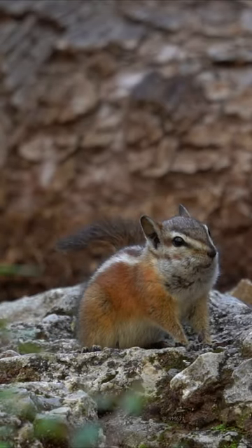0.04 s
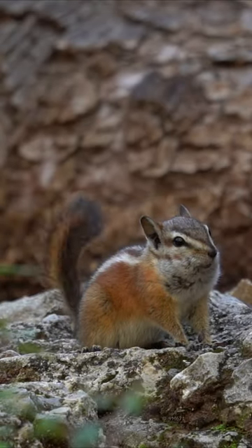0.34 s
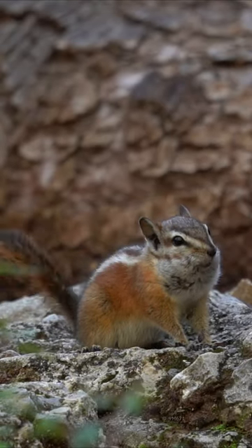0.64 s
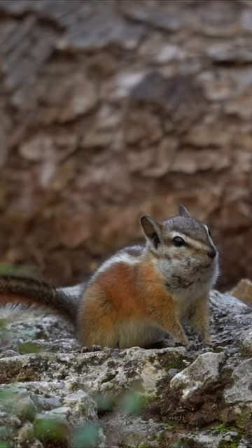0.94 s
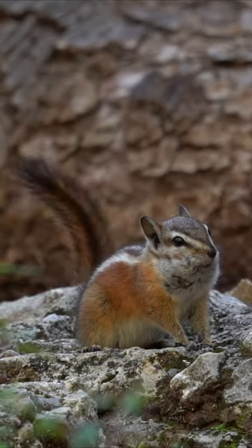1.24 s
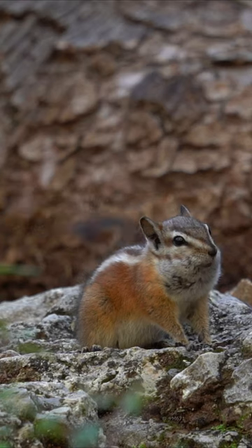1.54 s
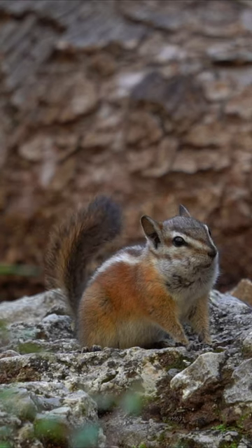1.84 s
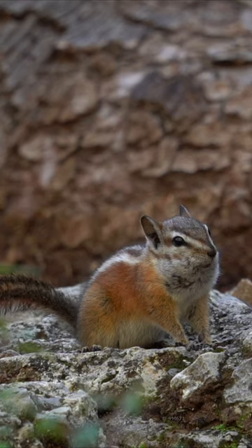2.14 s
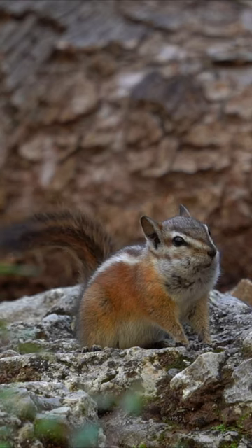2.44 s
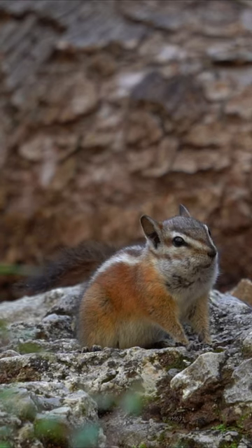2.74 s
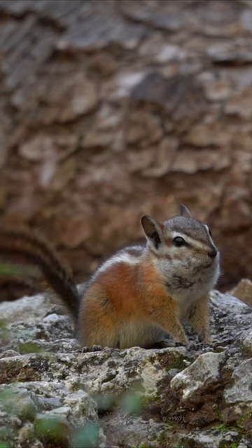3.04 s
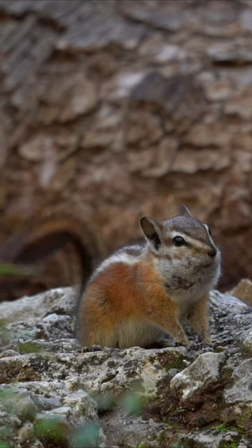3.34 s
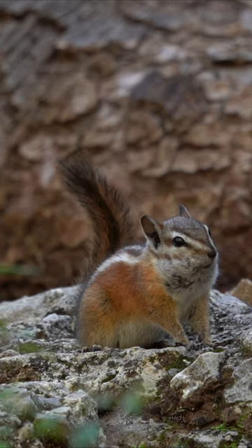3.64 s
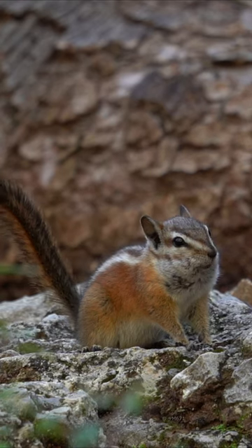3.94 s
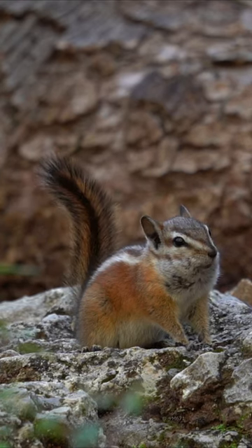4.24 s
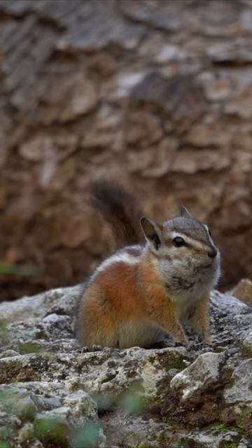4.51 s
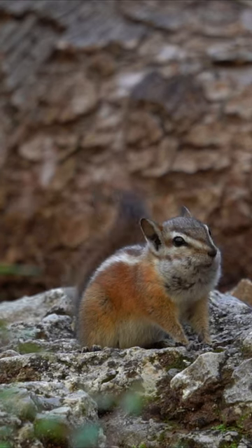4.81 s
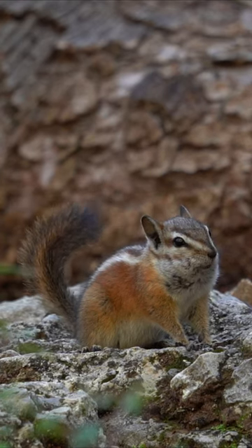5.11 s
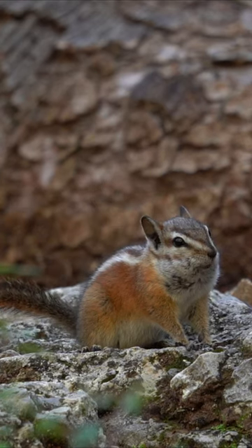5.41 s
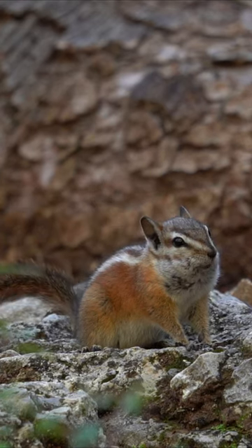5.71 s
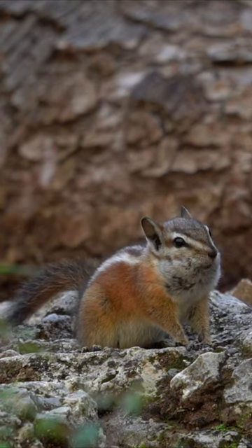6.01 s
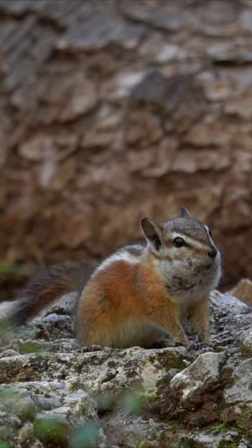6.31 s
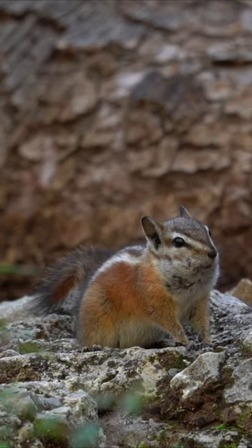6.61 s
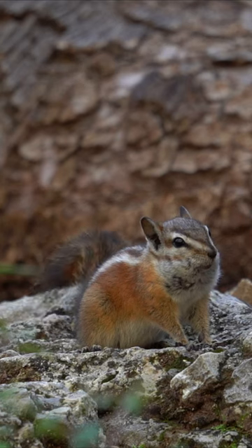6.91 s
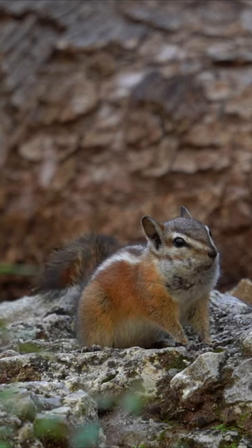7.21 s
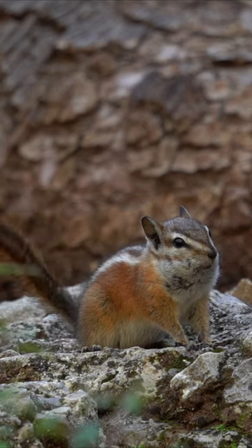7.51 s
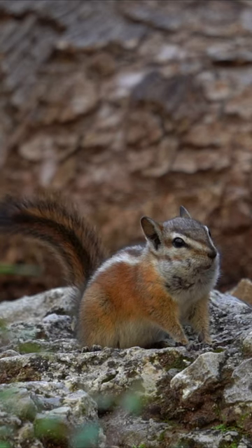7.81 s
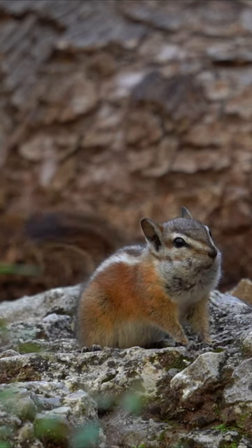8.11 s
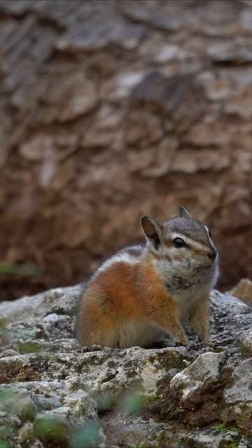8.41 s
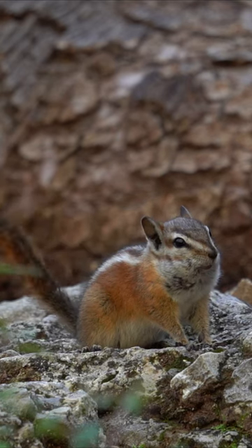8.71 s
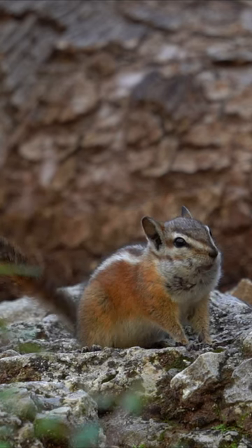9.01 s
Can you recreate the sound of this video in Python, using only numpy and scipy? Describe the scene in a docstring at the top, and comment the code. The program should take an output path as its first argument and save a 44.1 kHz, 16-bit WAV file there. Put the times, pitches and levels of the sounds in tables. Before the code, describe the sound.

Water rushes, bubbles and drips on stone while a chipmunk repeats brief, low chip calls two or three times a second.

```python
"""Chipmunk beside trickling water

A chipmunk on a rock gives two or three hollow chips a second, each a rising, nearly pure tone that
echoes off rock and trees. Close by on the left, water rushes as broadband noise, trapped bubbles
gurgle as damped oscillators, and drops tick on stone as impulses with a brief ring.
Now and then something knocks lightly, or rustles softly on the right."""
import sys
import numpy as np
from scipy import signal
from scipy.io import wavfile

SR = 44100
rng = np.random.default_rng(int(sys.argv[2]) if len(sys.argv) > 2 else 0)


def put_to_file(sound):
    """Save the sound as 16-bit audio at rate SR, in the file named by the first command-line argument."""
    columns = np.atleast_2d(sound).T  # one column per channel
    safe = np.clip(columns, -1, 1)
    whole_steps = np.round(safe * 32767)
    wavfile.write(sys.argv[1], SR, whole_steps.astype(np.int16))


N = 403515

# spectra of the water's low rush and of its spray: f/Hz, relative spectral density/dB
BODY_SPECTRUM = [(25, -48), (50, -36), (95, -40), (130, -30), (180, -16.5), (330, -12), (480, -3.5),
                 (680, 0), (900, 0), (1400, -3), (2000, -7), (2600, -10), (4000, -16.5), (8000, -48)]
SPRAY_SPECTRUM = [(1800, -16), (3000, 1), (4000, 1), (5200, 2.5), (7000, 0.5), (10000, -3.5), (13000, -8.5),
                  (16000, -10)]
# likeness of the rush in the two ears: f/Hz, correlation (limited to +-1 in use)
EAR_CORRELATION = [(130, 1.7), (290, 0.83), (640, 0.85), (1400, 0.37), (2300, -0.26), (3100, -0.31),
                   (6800, -0.05), (15000, -0.13)]
# direction of the rush: f/Hz, pan/dB (pan is always left level minus right level)
RUSH_PAN = [(150, .2), (380, 1.5), (700, 4.5), (1300, 4), (4400, 2.3), (8000, 3.1), (15000, 5.5)]
# strength of the spray, which picks up after the first seconds: t/s, relative level/dB
SPRAY_CURVE = [(0, -42.5), (2.2, -42), (3.2, -40.5), (3.49, -39.5), (4.4, -40.5), (6.4, -39.5), (9.15, -41)]
# strength of the froth, which sizzles up twice: t/s, relative level/dB
FROTH_CURVE = [(0, -51), (1.1, -56), (1.4, -41.5), (2.2, -40.5), (2.6, -48), (5.8, -49), (7.7, -38),
               (8.3, -48), (9.15, -42)]
# chip calls: t/s at the loudest point, peak level/dB, pan/dB
CHIP_CALLS = [(0.291, -11.5, -6.5), (0.7144, -11.5, -6), (1.246, -15.5, -7), (1.6058, -14.5, 4),
              (1.992, -14.5, -.4), (2.403, -15.5, -1), (3.019, -10.5, 1.9), (3.4098, -11, 3.1),
              (3.7999, -11, 1.3), (4.1868, -10.5, -1.5), (4.5415, -10.5, -2), (4.8842, -11, -1),
              (5.2749, -10, -2.4), (5.6726, -10.5, -2.4), (6.0309, -11, -1), (6.4291, -11.4, -1),
              (6.8767, -11, -3.4), (7.3423, -11, -4.4), (7.7605, -11, -4.3), (8.1988, -10.5, -3.9),
              (8.6799, -10, -3.7), (9.1364, -11.5, -3)]
# reflections off rock and trees: delay/s, gain/dB, pan/dB
REFLECTIONS = [(.0095, -15, -10), (.029, -21, 7), (.061, -19, 5), (.09, -21.5, 7)]
# the loudest bubbles: t/s, starting f/Hz, nominal peak level/dB, mean fractional rise of f, pan/dB
LOUD_BUBBLES = [(.339, 456, -20, 0.84, 8), (.355, 632, -22, .57, 8), (.668, 743, -18.5, 0.031, 11),
                (1.138, 720, -20, .05, 7), (2.457, 1490, -17, .18, 14), (2.540, 640, -20.5, 0.01, 5),
                (2.637, 405, -25, .3, 5), (2.759, 945, -23, .07, 5), (3.333, 594, -18.5, .36, 5),
                (3.345, 703, -20.5, 0.96, 5), (3.487, 644, -20, 0.7, 6), (3.589, 890, -20, 0.21, 5),
                (4.124, 645, -20.5, 0.2, 4), (4.159, 2900, -22.5, 0.05, 4), (4.247, 676, -17.5, 0.073, 3),
                (4.651, 3850, -23, .06, 8), (4.832, 746, -23, .1, 2), (5.404, 704, -21, 0.22, 4),
                (6.785, 750, -19.5, 0.19, 7), (8.351, 1900, -20, .12, 15), (8.475, 570, -22, 0.42, 7),
                (8.766, 940, -17, 0.054, 6)]
# the loudest drops and ticks: t/s, peak level/dB, f/Hz, bandwidth/Hz, pan/dB
SHARP_IMPACTS = [(.338, -15, 8000, 4070, 14), (.530, -23, 4700, 200, 6), (2.114, -21, 5995, 247, 16),
                 (2.508, -14.5, 10700, 4020, 8), (2.870, -20, 3220, 700, 5), (3.355, -17, 10300, 3000, -10),
                 (4.872, -17, 12200, 4000, 8), (5.436, -16, 11600, 2000, 9), (5.746, -14, 13700, 2000, 10),
                 (6.539, -12.5, 8900, 3500, 5), (6.778, -8, 5650, 1100, 0), (7.378, -15.5, 9350, 999, 9),
                 (7.462, -18, 13400, 3030, 8), (7.523, -18, 6700, 1200, 8), (8.2858, -3, 8750, 3205, 9)]
# knocks and dull plops: t/s, peak level/dB, f/Hz, bandwidth/Hz, upper edge/Hz, pan/dB
DULL_IMPACTS = [(0.926, -20, 1720, 400, 2385, 7), (1.342, -15.5, 1102, 487, 2400, 11),
                (1.762, -14.5, 1160, 299, 2407, 12), (3.6938, -8, 654, 331, 1320, -2),
                (4.481, -18, 719, 250.3, 1398, -1), (6.2556, -15.5, 2190, 130, 4500, 0)]
# rustles: t/s, duration/s, level/dB at the crest, lower edge/Hz, upper edge/Hz, pan/dB
RUSTLE_BURSTS = [(3.347, 0.33, -39.5, 3900, 6060, -11), (3.878, 0.22, -37, 5160, 7470, -3),
                 (3.947, .15, -36.5, 8000, 15000, -3), (4.902, 0.18, -45, 9000, 14900, -8),
                 (6.23, .085, -32, 2000, 8700, -3), (6.251, 0.74, -50, 4950, 15000, -3)]


def from_db(db):
    """Amplitude grows tenfold for every 20 dB."""
    return 10 ** (np.asarray(db) / 20)


def unit_rms(x):
    """Division by the RMS amplitude gives unit power."""
    return x / np.sqrt(np.mean(x ** 2) + 1e-20)


def at_hz(points, hz):
    """Interpolation of a curve on a logarithmic frequency axis."""
    frequencies, values = np.transpose(points)
    return np.interp(np.log(hz), np.log(frequencies), values)


def in_time(points):
    """Linear interpolation of a curve at every sample."""
    return np.interp(np.arange(N) / SR, *np.transpose(points))


def panned(pan_db):
    """A level difference between the ears sets direction at constant total power."""
    return unit_rms(from_db([[pan_db / 2], [-pan_db / 2]]))


def add(out, s, sound):
    """Superposition: a stereo sound joins the mix at s seconds."""
    at = max(round(s * SR), 0)
    room = max(min(sound.shape[1], N - at), 0)
    out[:, at:at + room] += sound[:, :room]


def band(x, low_hz, high_hz, order=2):
    """A Butterworth band-pass attenuates what lies outside its edges."""
    edges = [min(low_hz, .4 * SR), min(high_hz, .47 * SR)]
    return signal.sosfilt(signal.butter(order, edges, "band", fs=SR, output="sos"), x + 1e-18)


def resonance(x, hz, width_hz):
    """A damped resonator of unit peak gain: the wider its band, the shorter its ring."""
    r = np.exp(-np.pi * width_hz / SR)
    feedback = [1, -2 * r * np.cos(2 * np.pi * hz / SR), r * r]
    return signal.lfilter(np.array([1, 0, -1]) * (1 - r * r) / 2, feedback, x + 1e-18)


def drift(corner_hz):
    """Low-passed noise gives a slow random fluctuation of unit RMS."""
    step, settling = 40, 2000
    r = np.exp(-2 * np.pi * corner_hz * step / SR)
    noise = rng.standard_normal(N // step + settling + 2)
    slow = signal.lfilter([1], [1, -2 * r, r * r], noise)[settling:]
    return np.interp(np.arange(N) / step, np.arange(len(slow)), unit_rms(slow))


def rush(spectrum, flicker_db, flicker_hz):
    """Running water radiates broadband noise whose half-octave bands fluctuate independently."""
    out, edges = 0, 24 * 2 ** np.arange(0, 9.6, .5)
    white = rng.standard_normal((2, 2, N))
    for k, (low, high) in enumerate(zip(edges, edges[1:])):
        if high < spectrum[0][0] or low > spectrum[-1][0]:
            continue
        hz = np.sqrt(low * high)
        mid, side = band(white[k % 2], low, high)
        correlation = np.clip(at_hz(EAR_CORRELATION, hz), -1, 1)
        stereo = np.sqrt(1 + correlation) * mid + np.sqrt(1 - correlation) * side * [[1], [-1]]
        gain = from_db(at_hz(spectrum, hz) + flicker_db * drift(flicker_hz))
        out = out + gain * panned(at_hz(RUSH_PAN, hz)) * stereo
    return unit_rms(out)


def spatter(per_s=260, spread_db=4, q_factor=14, impact_db=-17, pitches=20):
    """Shot noise: tiny droplets land at random, mostly to the left, each a click and a short ring."""
    rings, impacts = np.zeros((2, N)), np.zeros((2, N))
    for hz in np.geomspace(3300, 13000, pitches):
        place, size, side = rng.random((int(per_s / pitches * N / SR), 3)).T
        strengths = from_db(spread_db * np.minimum(-np.log(1 - size), 3.5))
        clicks = np.zeros((2, N))
        clicks[:, (place * N).astype(int)] = strengths * [np.cos(side - .4), np.sin(side - .4)]
        rings += resonance(clicks, hz, hz / q_factor)
        impacts += clicks
    return unit_rms(rings + from_db(impact_db) * band(impacts, 5100, 16000))


def froth(centre_hz=5100, width_hz=1300, flicker_db=4.0):
    """Bursting bubbles of one size share a frequency, so their sizzle is narrow-band noise."""
    noise = rng.standard_normal((2, N)) + 1j * rng.standard_normal((2, N))
    baseband = signal.sosfilt(signal.butter(2, width_hz / 2, fs=SR, output="sos"), noise)
    sizzle = np.real(baseband * np.exp(2j * np.pi * centre_hz * np.arange(N) / SR))
    flicker = from_db(flicker_db * drift(45))
    return unit_rms(sizzle * flicker) * from_db(in_time(FROTH_CURVE)) * panned(8.6)


def bubble(hz, rise, cycles=26, swell_cycles=2.0, wobble=0.32):
    """A trapped bubble is a damped oscillator whose frequency rises as it nears the surface."""
    age = np.arange(int(cycles / hz * SR)) * hz / SR   # in periods of the starting frequency
    envelope = (1 - np.exp(-(age / swell_cycles) ** 2)) * from_db(-40 * age / cycles)
    uneven = np.interp(age, np.linspace(0, cycles, 12), rng.normal(1, wobble, size=12))
    phase = 2 * np.pi * age * (1 + rise * age / cycles)
    return envelope / envelope.max() * uneven * np.sin(phase)


def gurgle(per_s=100, small_db=-34.5, spread_db=3.5, lowest_hz=560, db_per_octave=-3.0):
    """Bubble resonance: a few loud bubbles ring among many faint ones, fainter toward the treble."""
    out = np.zeros((2, N))
    for s, hz, db, rise, pan_db in LOUD_BUBBLES:
        add(out, s, bubble(hz, rise) * from_db(db) * panned(pan_db))
    for place, pitch, size, side, life, lift in rng.random((int(per_s * N / SR), 6)):
        octaves = 3 * pitch
        strength = min(-np.log(1 - size), 3)   # capped exponential distribution
        db = small_db + db_per_octave * octaves + spread_db * strength
        plop = bubble(lowest_hz * 2 ** octaves, rise=.7 * lift ** 2, cycles=12 + 20 * life)
        add(out, place * N / SR, plop * from_db(db) * panned(12 * side - 1))
    return out


def chipmunk(crest_hz=1071.7, sweep_hz_per_s=7500, octave_db=-32, waver=0.0081, right_lag_s=.000025):
    """Each chip is a linear frequency sweep with a faint octave; reflections return delayed copies."""
    out = np.zeros((2, N))
    attack_s, hold_s, release_s = .012, 0.0018, 0.0073
    t = np.arange(-attack_s, hold_s + release_s, 1 / SR)
    opening = np.interp(t, [t[0], 0, hold_s, t[-1]], [0, 1, 1, 0])
    envelope = np.sin(np.pi / 2 * opening)
    for s, db, pan_db in CHIP_CALLS:
        unsteady = signal.resample(rng.normal(0, waver, size=6), len(t))
        cycles = np.cumsum((crest_hz + sweep_hz_per_s * t) * (1 + unsteady)) / SR
        phase = 2 * np.pi * (cycles - crest_hz * np.array([[0], [right_lag_s]]))
        octave = from_db(octave_db) * envelope * np.sin(2 * phase)
        call = from_db(db) * envelope * (np.sin(phase) + octave)
        add(out, s + t[0], call * panned(pan_db))
        for delay, echo_db, echo_pan_db in REFLECTIONS:
            add(out, s + t[0] + delay, call * from_db(echo_db) * panned(echo_pan_db))
    return out


def tick(hz, width_hz, splash_db=-20, splash_s=0.0027):
    """An impulse excites a brief resonance, followed by a decaying splash that differs in each ear."""
    t = np.arange(SR // 40) / SR
    push = from_db(splash_db) * rng.standard_normal((2, len(t))) * np.exp(-t / splash_s)
    push[:, 0] += 1
    sound = band(resonance(push, hz, width_hz), 0.63 * hz, 2 * hz, order=3)
    return sound / np.abs(sound).max()


def loud_ticks():
    """The strongest drops and contacts stand out of the rush as single transients."""
    out = np.zeros((2, N))
    for s, db, hz, width_hz, pan_db in SHARP_IMPACTS:
        add(out, s, tick(hz, width_hz) * from_db(db) * panned(pan_db))
    return out


def glugs(per_s=1.5, level_db=-24.5, lowest_hz=540, highest_hz=1500, most_rise=.8):
    """Middling bubbles break loose at random on the left and ring in free oscillation."""
    out = np.zeros((2, N))
    for place, pitch, lift in rng.random((int(per_s * N / SR), 3)):
        plop = bubble(lowest_hz * (highest_hz / lowest_hz) ** pitch, rise=most_rise * lift)
        add(out, place * N / SR, plop * from_db(level_db) * panned(6))
    return out


def drips(flow_db, per_s=1.5, over_flow_db=18, lowest_hz=4200, highest_hz=13100, q_factor=11):
    """Stray drops strike the stone as random impulses whose strength follows the spray."""
    out = np.zeros((2, N))
    for place, pitch in rng.random((int(per_s * N / SR), 2)):
        hz = lowest_hz * (highest_hz / lowest_hz) ** pitch
        add(out, place * N / SR, tick(hz, hz / q_factor))
    return out * from_db(flow_db + over_flow_db) * panned(8)


def knocks():
    """Each knock is the impulse response of a damped resonance, dulled by a band-pass."""
    out, blow = np.zeros((2, N)), signal.unit_impulse(SR // 20)
    for s, db, hz, width_hz, edge_hz, pan_db in DULL_IMPACTS:
        sound = band(resonance(blow, hz, width_hz), .5 * hz, edge_hz, order=4)
        add(out, s, sound / np.abs(sound).max() * from_db(db) * panned(pan_db))
    return out


def babble(crest_s=3.4, spread_s=0.72, crest_db=-39.5, low_hz=1148, high_hz=1890, flicker_db=3):
    """Chattering water is amplitude-modulated mid-range noise; it swells once in a Gaussian envelope."""
    swell = np.exp(-((np.arange(N) / SR - crest_s) / spread_s) ** 2)
    chatter = band(rng.standard_normal((2, N)), low_hz, high_hz) * from_db(flicker_db * drift(40))
    return unit_rms(chatter) * swell * from_db(crest_db) * panned(5)


def rustles(grain_db=4):
    """Brushing makes friction noise: grains of random strength that swell and fade together."""
    out = np.zeros((2, N))
    for s, duration, db, low_hz, high_hz, pan_db in RUSTLE_BURSTS:
        n = int(duration * SR)
        grains = rng.standard_normal((2, n)) * from_db(grain_db * rng.standard_normal(n))
        stroke = unit_rms(band(grains, low_hz, high_hz)) * np.sqrt(np.hanning(n))
        add(out, s, stroke * from_db(db) * panned(pan_db))
    return out


def scene(body_db=-31.6, body_share=0.17, spray_gain_db=2.5, spatter_gain_db=-5, froth_gain_db=-2):
    """The caller, the running water and the small noises add by linear superposition."""
    flow_db = in_time(SPRAY_CURVE)
    spurting_db = flow_db + 1.17 * drift(36)   # the spray comes in quick small spurts
    body_swing_db = body_share * (flow_db - flow_db.mean())
    body = from_db(body_db + body_swing_db) * rush(BODY_SPECTRUM, flicker_db=2.5, flicker_hz=27.6)
    spray = from_db(spurting_db + spray_gain_db) * rush(SPRAY_SPECTRUM, flicker_db=1.85, flicker_hz=92)
    droplets = from_db(spurting_db + spatter_gain_db) * spatter()
    sizzle = from_db(froth_gain_db) * froth()
    water = body + spray + droplets + sizzle + gurgle() + glugs() + babble() + drips(flow_db)
    return chipmunk() + water + loud_ticks() + knocks() + rustles()


def record(dry):
    """An elliptic low-pass cuts the highest treble steeply."""
    cutoff_hz = 16050
    return signal.sosfilt(signal.ellip(12, .1, 80, cutoff_hz, fs=SR, output="sos"), dry)


dry = scene()
out = record(dry)
put_to_file(out)
```